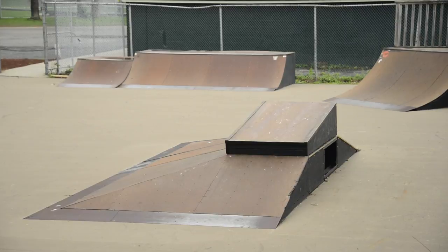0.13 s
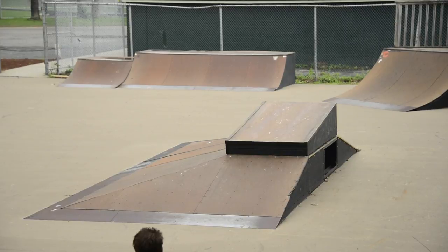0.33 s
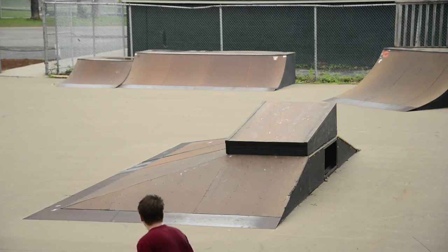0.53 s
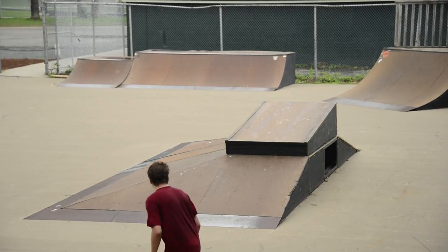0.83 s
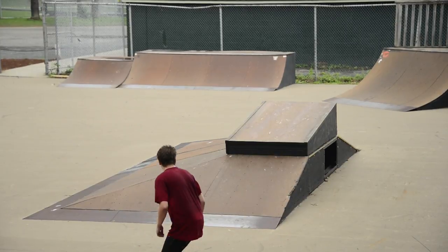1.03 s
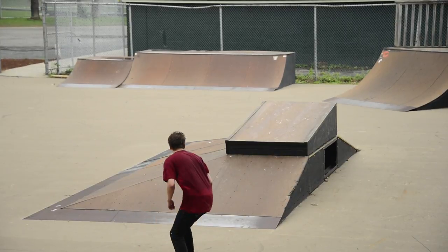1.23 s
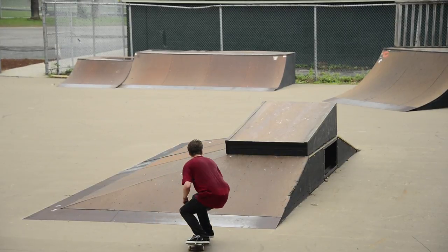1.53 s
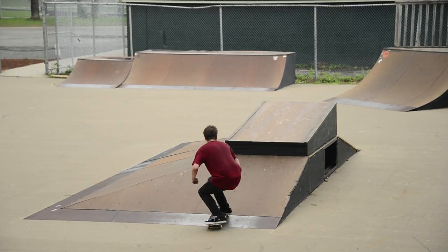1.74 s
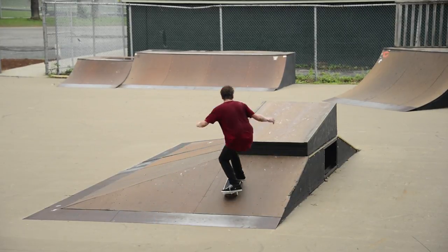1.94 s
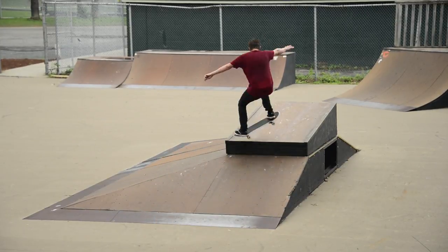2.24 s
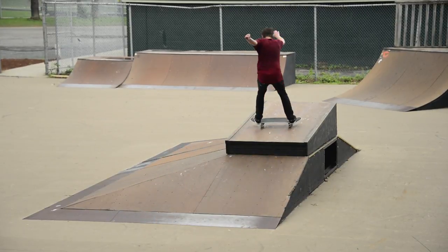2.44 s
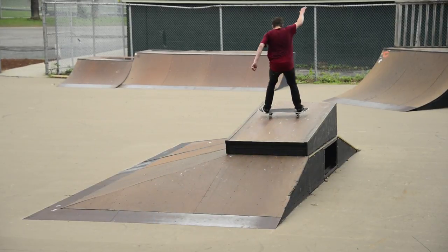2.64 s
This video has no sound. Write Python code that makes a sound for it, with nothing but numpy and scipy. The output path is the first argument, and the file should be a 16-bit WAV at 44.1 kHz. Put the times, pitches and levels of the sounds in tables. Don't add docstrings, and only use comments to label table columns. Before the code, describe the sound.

A skateboard rumbles over gritty concrete from the near-silent first 0.08 s, with pebbly knocks until 0.45. Loose trucks rattle metallically at 1.02-1.25 over a seam. Two hard clacks hit a steel-lipped hollow ramp at 1.83 and 1.9, followed by a short woody roll, light scuffs, a tail snap at 2.2 and the loudest flat landing at 2.43, then fading roll. Outdoor echo, faint wind, distant fixed microphone, clipped peaks.

```python
import sys
import numpy as np
from scipy import signal
from scipy.fft import rfft, irfft, next_fast_len
from scipy.io import wavfile
from scipy.ndimage import map_coordinates

SR = 44100
rng = np.random.default_rng(int(sys.argv[2]) if len(sys.argv) > 2 else 0)


def volts(x):
    e = np.asarray(x, float) / 20
    return 10 ** e


def wrap_up_sound(samples):
    columns = np.atleast_2d(samples).T
    tamed = np.clip(columns, -1, 1)
    steps = np.round(tamed * 32767).astype(np.int16)
    wavfile.write(sys.argv[1], SR, steps)


N = 123479

# frequency in Hz, density in dB per Hz.
HISS_SPECTRUM = [(15, -40), (40, -6), (1860, -2), (2430, -13), (4750, -11), (9000, -27), (15500, -35),
                 (20000, -60)]
# time in seconds, level in dB.
GUSTS = [(.08, -34), (.3, -36), (.55, -42), (.85, -41), (1.3, -40), (1.8, -46), (2.1, -42), (2.22, -32),
         (2.36, -49), (2.5, -40), (2.8, -50)]
# frequency in Hz, 60 dB decay time in seconds.
FENCE_DECAY = [(100, 0.87), (500, 0.94), (2000, 0.43), (6000, 0.59), (10000, 0.68), (15000, 0.17)]
# time in seconds, lag in ms, strength in dB.
ECHO_PATH = [(.1, 1.75, -12), (.3, 2.12, -7), (.5, 2.5, -5), (1, 3.05, -3), (1.5, 3.45, -3), (2, 3.75, -4),
             (2.8, 3.8, -6)]
# centre in seconds, level in dB, length in seconds, pitch in Hz.
SWELLS = [(.125, -25, .015, 1650), (.2, -21, .04, 1610), (.38, -25, .05, 1690), (.26, -26, .07, 880),
          (.4, -26, .015, 1300), (.35, -28, .08, 510), (.5, -26, .05, 410), (.79, -25, .1, 372),
          (.85, -27, .12, 1040), (1.49, -26, .07, 345), (.9, -28, .1, 1670)]

# start in seconds, level in dB, pitch in Hz.
RATTLES = [(1.0197, -17, 5270), (1.027, -14, 4900), (1.0322, -10.5, 5250), (1.033, -11, 5500),
           (1.035, -14, 4970), (1.038, -6.5, 5000), (1.041, -15, 4700), (1.043, -13, 5600),
           (1.047, -7, 5300), (1.051, -16, 5600), (1.0552, -19, 5370), (1.062, -31, 4830),
           (1.0755, -17, 5370), (1.081, -21, 5000), (1.087, -24, 5570), (1.097, -25, 5000),
           (1.169, -25, 5030), (1.1732, -22, 5600), (1.1783, -17, 5040), (1.179, -12.5, 4870),
           (1.193, -11, 5200), (1.197, -23, 5400), (1.219, -24, 4640), (1.2278, -24, 5370),
           (1.232, -21, 4970), (1.243, -19, 4900), (1.248, -26, 5300), (1.256, -24, 5600),
           (1.85, -15, 4730), (1.8617, -18, 4500), (1.932, -8, 4830), (1.936, -14, 4960)]
# start in seconds, level in dB, length in seconds.
CHATTER = [
    (1.023, -6.5, 0.015),
    (1.076, -25, 0.013),
    (1.157, -19, 0.026),
    (1.236, -30, 0.02),
    (1.937, -12.5, 0.033),
]
# start in seconds, level in dB.
SEAMS = [
    (1.205, -18),
    (1.185, -23),
    (0.17, -24),
    (1.04, -18),
    (1.23, -23),
]
# start in seconds, level in dB.
CRACKS = [
    (1.0273, -15),
    (1.829, -12),
    (1.832, -9),
    (1.898, -8),
    (1.9035, -13),
    (2.1995, -14),
    (2.4297, -11),
]

# start in seconds, deck, ramp boom and steel in dB, length in seconds.
LIP_BLOWS = [
    (1.828, -3.5, -10.5, -4, 0.0035),
    (1.8315, 0, -19, -6, 0.0029),
    (1.836, -13, -24, -4.5, 0.01),
    (1.8445, -13, -15.5, -20, 0.0022),
    (1.887, -10, -11.5, -24, 0.0064),
    (1.8975, 2, -13, 3.5, 0.0067),
    (1.903, -6, -38, -5, 0.0022),
    (1.909, -7, -22, -1, 0.0029),
    (1.962, -16, -16.5, -24, 0.0059),
    (2.12, -34, -37, -23.5, 0.025),
]
# start in seconds, deck, ramp boom and steel in dB, length in seconds.
POP_BLOWS = [
    (2.194, -7, -45, -22, 0.0042),
    (2.198, 2.5, -19, -39, 0.0026),
    (2.203, -20, -45, -7, 0.0011),
    (2.21, -23, -42, -39, 0.019),
    (2.376, -16, -36, -24, 0.0025),
    (2.381, -33, -42, -38, 0.0036),
]
# start in seconds, deck, box boom and steel in dB, length in seconds.
LANDING_BLOWS = [
    (2.4292, 9.5, -7, -15, 0.0017),
    (2.432, -1.5, -17, -11.5, 0.0025),
    (2.445, -25, -13, -30, 0.0011),
    (2.455, -37, -16, -40, 0.023),
    (2.585, -26, -21.5, -47, 0.011),
]

# start in seconds, level in dB.
PEBBLES = [(0.098, -13), (0.122, -10), (0.17, -4.5), (.173, -12.5), (0.206, -7.5), (.24, -10),
           (0.2535, -10.5), (0.2725, -9.5), (.305, -9), (.333, -11), (0.352, -10), (0.376, -9), (.383, -9),
           (0.403, -8.5), (0.425, -8.5), (.75, -14), (1.267, -16)]
# start in seconds, level in dB, length in seconds.
TAPS = [
    (1.8868, -2.5, 0.002),
    (1.961, -4.5, 0.0015),
    (2.294, -20.5, 0.012),
]
# start in seconds, level in dB, length in seconds.
NICKS = [
    (2.12, -18, 0.005),
    (2.129, -15.5, .003),
    (2.142, -23, 0.0032),
    (2.146, -27, 0.0036),
]

# time in seconds, level in dB, brightness in dB.
CONCRETE_ROLL = [(.08, -17.5, -1.5), (.2, -23, 2.5), (.4, -23.5, 1.5), (.52, -22, 0), (.78, -21.5, 0),
                 (.95, -23, -0.5), (1.2, -24, 2), (1.39, -27.5, 5.5), (1.43, -23, 0), (1.81, -25.5, -1),
                 (1.84, -12.5, -3.5), (1.9, -84, 0)]
PLYWOOD_ROLL = [(1.82, -60, 0), (1.85, -19, -5), (1.98, -27.5, 4.5), (2.1, -25, -4), (2.18, -31.5, 1.5),
                (2.3, -36, 5), (2.41, -44.5, 5), (2.46, -24.5, 1), (2.6, -31, -1.5), (2.8, -38.5, 0.5)]
# frequency in Hz, density in dB per Hz.
CONCRETE_SPECTRUM = [(40, -25), (186, -10), (382, -3), (710, -6), (1850, -6), (2450, -19), (3200, -22.5),
                     (5430, -17.5), (15000, -52.5)]
PLYWOOD_SPECTRUM = [(24, -35), (50, -21), (110, -2), (527, -9), (1350, -11.5), (1960, -14.5), (2280, -14),
                    (5560, -16.5), (15000, -55)]
# frequency in Hz, width in Hz, lift in dB.
DECK_LIFT = [(346, 19, 3), (470, 26, 4.5), (619, 15, 7.5), (950, 160, 4), (1270, 260, 3.5), (1580, 87, 6.5),
             (4220, 195, 6)]

# frequency in Hz, width in Hz, level in dB.
DECK_MODES = [(553, 290, -19.5), (1050, 290, -12), (1750, 1050, -13.5), (2260, 560, -8), (3400, 270, -10)]
TAIL_MODES = [(950, 600, -6), (1750, 600, -3), (2350, 500, 2), (3000, 1000, 2), (4800, 3000, -3)]
FLAT_MODES = [(580, 120, 1), (1140, 260, -1), (1850, 350, 0), (2260, 300, -4), (3350, 900, -4),
              (4250, 600, -8), (6200, 1500, -11)]
PANEL_MODES = [(98, 55, -1), (121.5, 93, 0), (294, 73, -2), (396, 130, -2.5)]
BOX_TOP_MODES = [(55, 18, -10), (93.5, 39.6, -3), (197, 74, -10.5), (335, 380, -10)]
STEEL_MODES = [(3840, 350, 6), (4770, 460, 10), (5960, 1370, 0), (7740, 1200, -7.5)]
PEBBLE_MODES = [(584, 250, -9.5), (1010, 500, -7.5), (1620, 310, -0.5), (2150, 300, -14.5)]
TAP_MODES = [(710, 800, -0.5), (1270, 700, 7.5), (2040, 800, 2)]
SCUFF_MODES = [(1600, 370, -1), (2160, 500, -0.5)]
TRUCK_MODES = [(4900, 620, 5), (5600, 660, 6), (6700, 1500, 0.5)]
THUMP_MODES = [(129, 110, -9), (239, 87, -5.5), (430, 47, 1)]
CRACK_MODES = [(3000, 3500, 0), (9000, 6000, -9)]


def unit(x):
    return x / np.sqrt(np.mean(x ** 2) + 1e-20)


def along(points, hz):
    f, v = np.transpose(points)
    return np.interp(np.log(hz + 1), np.log(f + 1), v)


def curve(rows, order=1):
    return np.interp(np.arange(N) / SR, np.transpose(rows)[0], np.transpose(rows)[order])


def wobble(rate):
    knots = rng.standard_normal(int(N * rate / SR) + 4)
    return map_coordinates(knots, [np.arange(N) * rate / SR])


def filtered(x, response):
    m = next_fast_len(len(x) + SR // 2)
    return irfft(rfft(x, m) * response(np.fft.rfftfreq(m, 1 / SR)), m)[:len(x)]


def body(modes):
    def response(f):
        return sum((-1) ** k * volts(db) * 1j * f * width / (hz * hz - f * f + 1j * f * width)
                   for k, (hz, width, db) in enumerate(modes))
    return response


def burst(start, db, length, modes, sharp):
    t = np.arange(SR // 4) / SR
    rise = np.clip(t / (sharp * length), 0, 1)
    contact = rng.standard_normal(len(t)) * rise * np.exp(-(t / length) ** 0.74)
    lowest, highest = modes[0][0], modes[-1][0]

    def response(f):
        below = 1j * f / (lowest + 1j * f)
        above = (1 + 1j * f / (1.15 * highest)) ** 3
        return body(modes)(f) * below / above

    ring = filtered(contact, response)
    out = np.zeros(N + SR)
    out[round(start * SR):][:len(t)] = volts(db) * ring / np.abs(ring).max()
    return out[:N]


def air():
    hiss = unit(filtered(rng.standard_normal(N), lambda f: volts(along(HISS_SPECTRUM, f))))
    rumble = unit(filtered(rng.standard_normal(N), lambda f: f / 50 / (1 + (f / 55) ** 4)))
    return volts(-46) * hiss + volts(curve(GUSTS)) * rumble * volts(1.3 * wobble(6.7))


def fences(x):
    hz, t, z = signal.stft(rng.standard_normal(SR), SR, nperseg=256)
    decay = volts(-60 * t / along(FENCE_DECAY, hz)[:, None])
    tail = signal.istft(z * decay, SR, nperseg=256)[1]
    delayed = np.pad(x, (500, 0))
    return signal.fftconvolve(delayed, tail / np.linalg.norm(tail))[:N]


def echo(x):
    low_hz, high_hz = 280, 2000
    source_sample = np.arange(N) - curve(ECHO_PATH) * SR / 1000
    late = map_coordinates(x, [source_sample], order=3) * volts(curve(ECHO_PATH, order=2))
    return x + filtered(late, lambda f: 1j * f / (low_hz + 1j * f) / np.sqrt(1 + (f / high_hz) ** 4))


def swells():
    t, q = np.arange(N) / SR, 16
    out = np.zeros(N)
    for centre, db, length, hz in SWELLS:
        mode = body([(hz, hz / q, 0)])
        tone = unit(filtered(rng.standard_normal(N), lambda f: mode(f) ** 2))
        out += volts(db) * np.exp(-((t - centre) / length) ** 2) * tone
    return out


def ticks():
    swell_s, upper_ratio, upper_db = .0003, 1.33, -4
    out = np.zeros(N)
    u = np.arange(SR // 100) / SR / swell_s
    for start, db, hz in RATTLES:
        lower_phase, upper_phase = 2 * np.pi * rng.random(2)
        turn = 2 * np.pi * hz * u * swell_s
        modes = np.sin(turn + lower_phase) + volts(upper_db) * np.sin(upper_ratio * turn + upper_phase)
        out[round(start * SR):][:len(u)] += volts(db) * 2 * u ** 2 * np.exp(-u) * modes
    return out


def rattles():
    buzz = sum(burst(s, db, length, TRUCK_MODES, 0.82) for s, db, length in CHATTER)
    buzz = filtered(buzz, lambda f: 1 / (1 + 1j * f / 8000) ** 2)
    thumps = sum(burst(s, db, 0.011, THUMP_MODES, 0.4) for s, db in SEAMS)
    return ticks() + buzz + thumps


def cracks():
    return sum(burst(s, db, 0.00024, CRACK_MODES, .2) for s, db in CRACKS)


def pebbles():
    return sum(burst(s, db, 0.001, PEBBLE_MODES, 0.23) for s, db in PEBBLES)


def taps():
    wheel_taps = sum(burst(s, db, length, TAP_MODES, 0.28) for s, db, length in TAPS)
    scuffs = sum(burst(s, db, length, SCUFF_MODES, 0.36) for s, db, length in NICKS)
    return wheel_taps + scuffs


def blows(table, deck, panel):
    out = np.zeros(N)
    for start, deck_db, boom_db, steel_db, length in table:
        out += burst(start, deck_db, length, deck, 0.069)
        out += burst(start, boom_db, length, panel, 0.077)
        out += burst(start, steel_db, length, STEEL_MODES, 0.12)
    return out


def wheels(level, spectrum, lumpy_db):
    grit_per_s, grit_db, bright_hz = 1500, -5, 860
    size = volts(3 * np.minimum(rng.exponential(size=N), 3))
    grit = (rng.random(N) < grit_per_s / SR) * rng.choice([-1, 1], N) * size
    lumps = volts(lumpy_db * wobble(45.1) + 0.91 * wobble(8.1))
    shake = (rng.standard_normal(N) + volts(grit_db) * unit(grit)) * lumps

    def response(f):
        lift = 1 + sum((volts(db) - 1) / (1 + 2j * (f - hz) / width) for hz, width, db in DECK_LIFT)
        return volts(along(spectrum, f)) * lift

    roll = unit(filtered(shake, response))
    low = filtered(roll, lambda f: 1 / (1 + (f / bright_hz) ** 4))
    level_db, bright_db = curve(level), curve(level, order=2)
    return volts(level_db) * (low + volts(bright_db) * (roll - low))


def scene():
    light = taps()
    rolling = wheels(CONCRETE_ROLL, CONCRETE_SPECTRUM, lumpy_db=1.0)
    rolling = rolling + wheels(PLYWOOD_ROLL, PLYWOOD_SPECTRUM, lumpy_db=1.3) + pebbles() + light
    hits = blows(LIP_BLOWS, DECK_MODES, PANEL_MODES)
    hits = hits + blows(POP_BLOWS, TAIL_MODES, PANEL_MODES)
    hits = hits + blows(LANDING_BLOWS, FLAT_MODES, BOX_TOP_MODES)
    loose = rattles() + cracks()
    answer = volts(-13.5) * fences(hits + light + volts(-5) * loose)
    return (echo(rolling) + hits + loose + answer + swells() + air())[None]


def band_limit(x):
    return signal.sosfilt(signal.butter(12, 15800, fs=SR, output="sos"), x)


def record(dry):
    low_hz, start_s, fade_s = 63, .0795, .005
    live = filtered(dry[0], lambda f: (1j * f / (low_hz + 1j * f)) ** 2)[None]
    live = live * np.clip((np.arange(N) / SR - start_s) / fade_s, 0, 1)
    clipped = live / (1 + np.abs(live) ** 16) ** (1 / 16)
    return band_limit(clipped)


dry = scene()
out = record(dry)
wrap_up_sound(out)
```